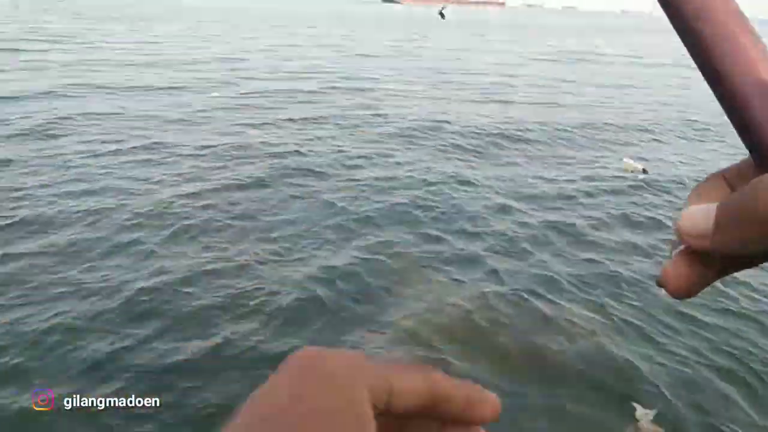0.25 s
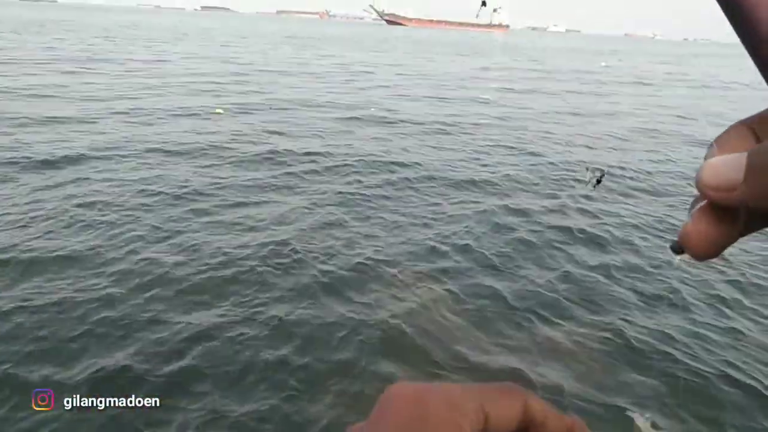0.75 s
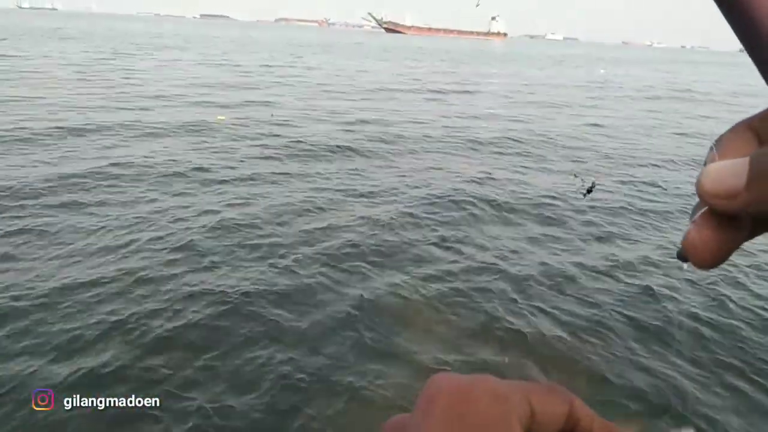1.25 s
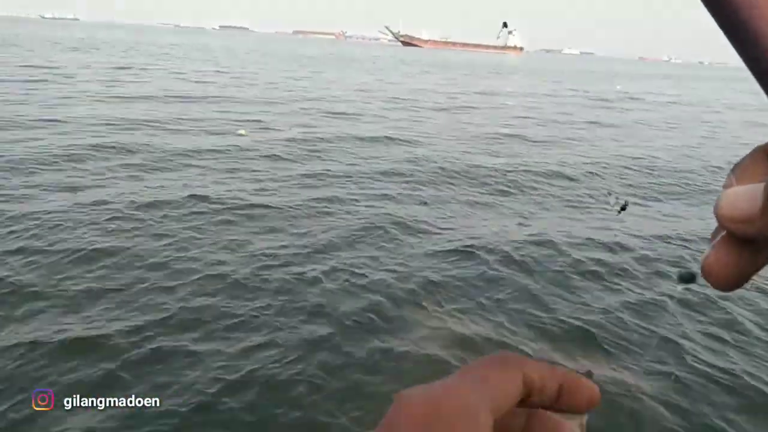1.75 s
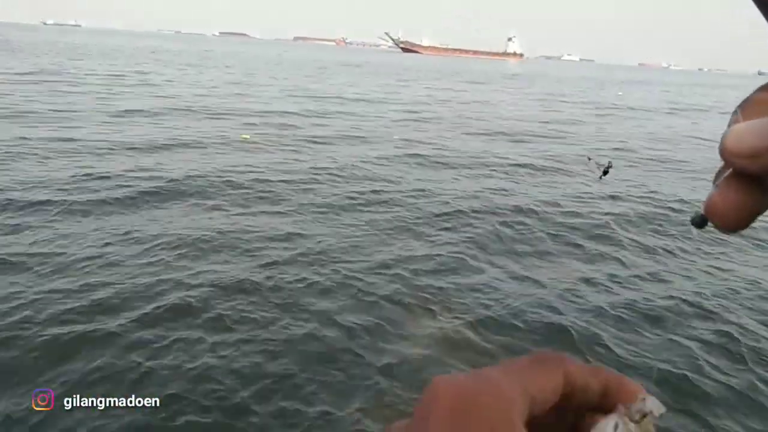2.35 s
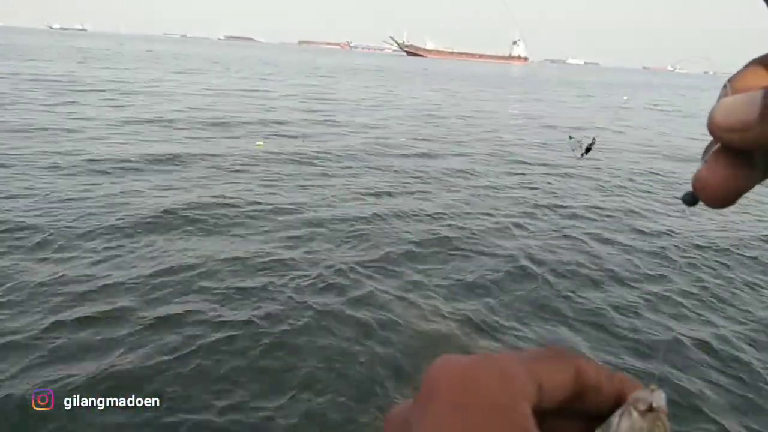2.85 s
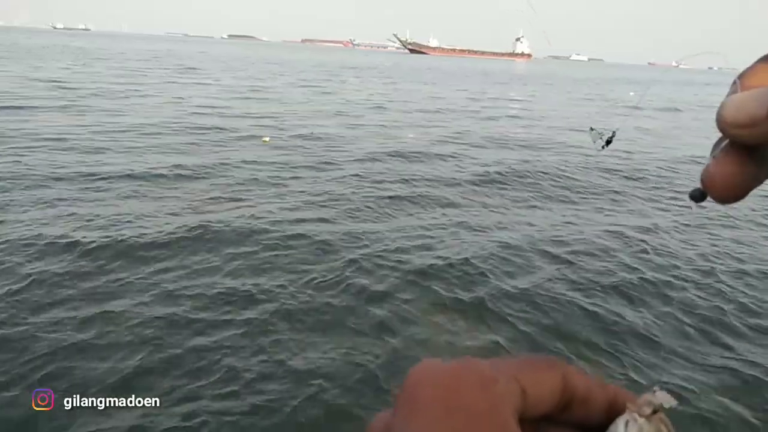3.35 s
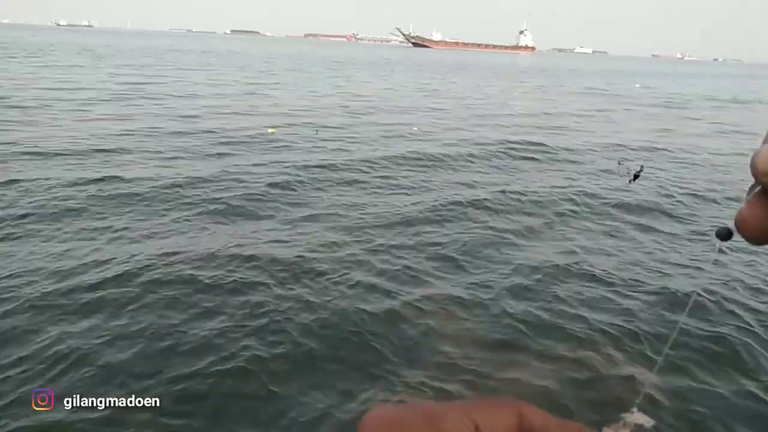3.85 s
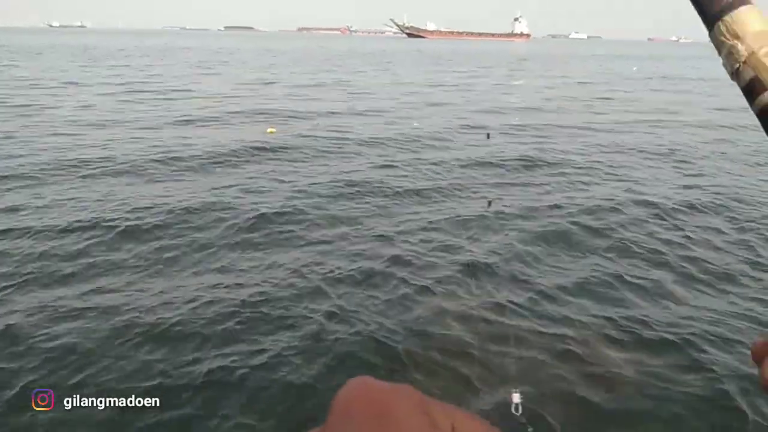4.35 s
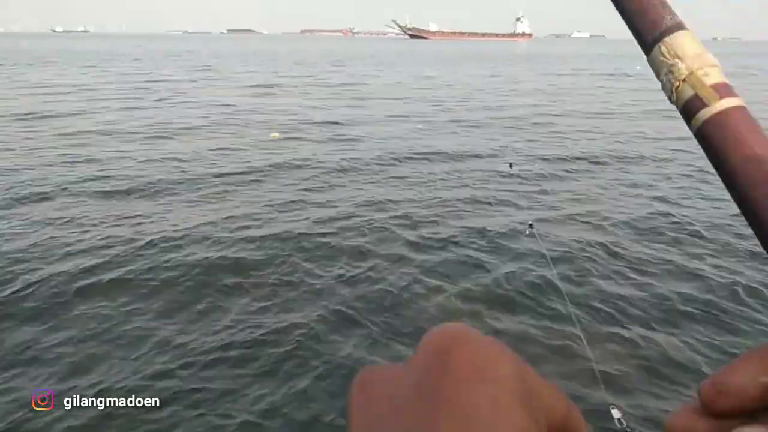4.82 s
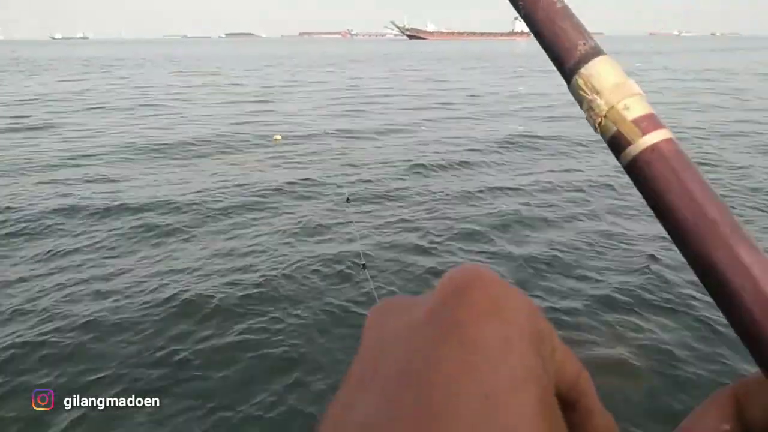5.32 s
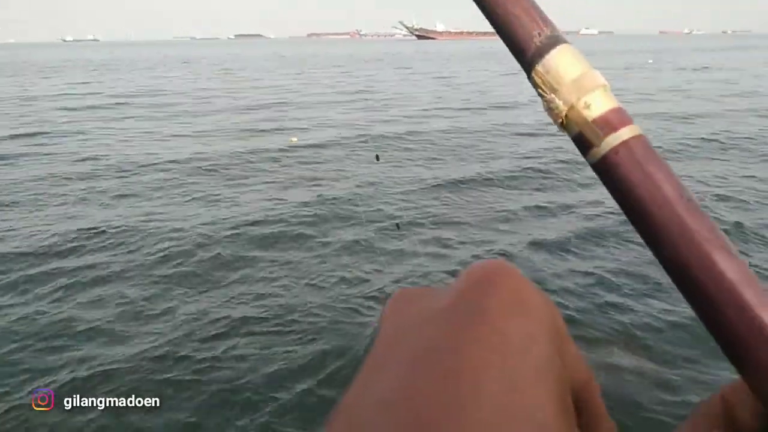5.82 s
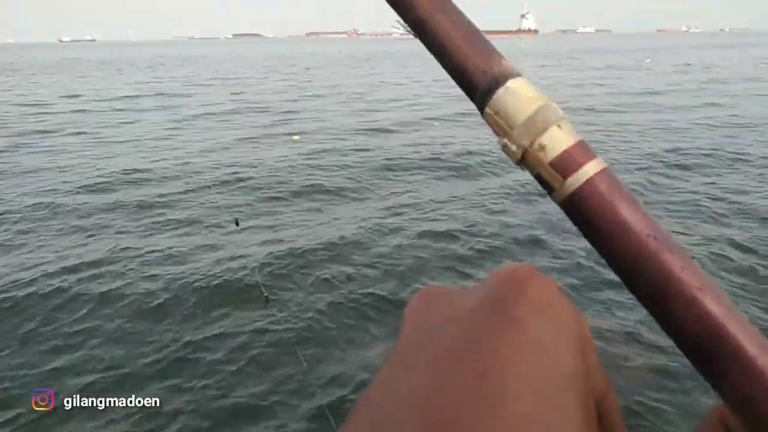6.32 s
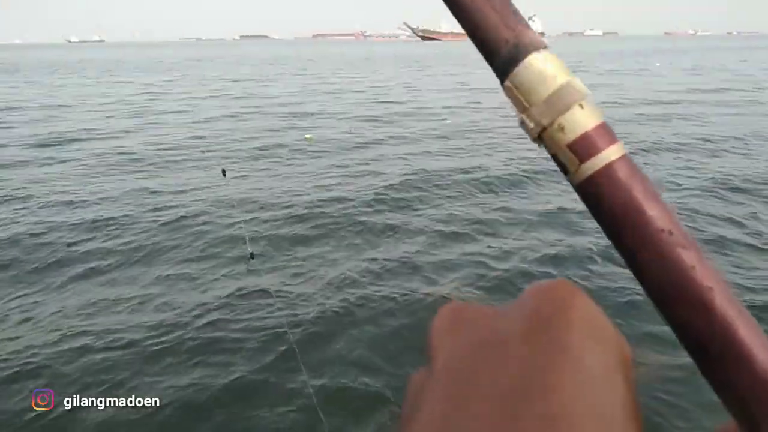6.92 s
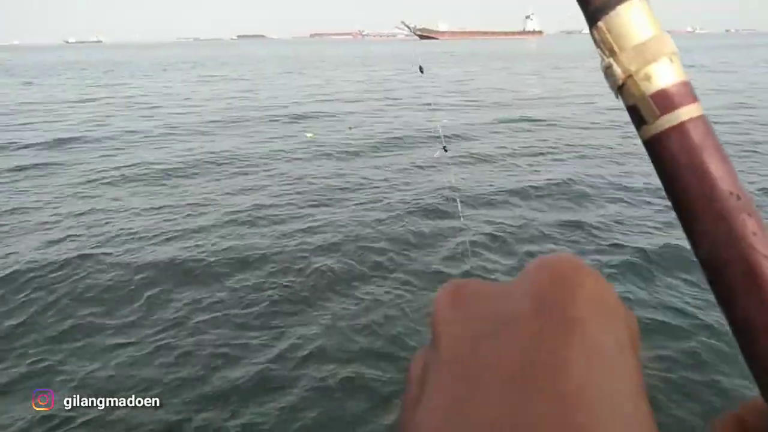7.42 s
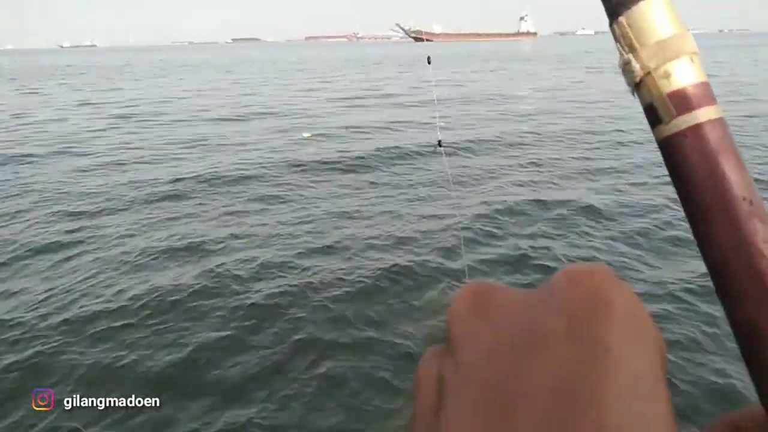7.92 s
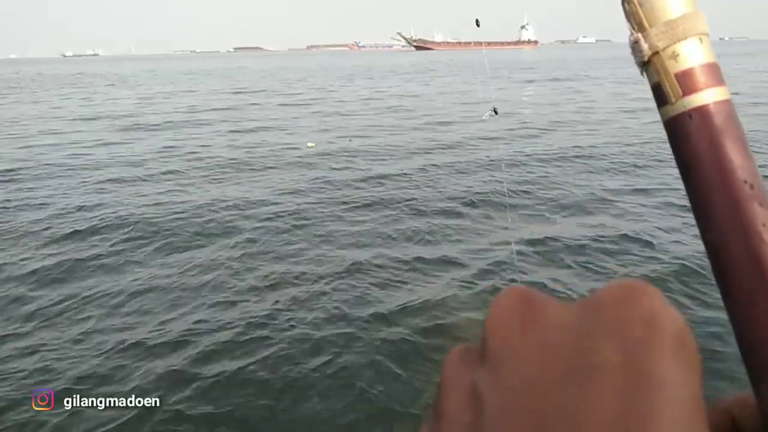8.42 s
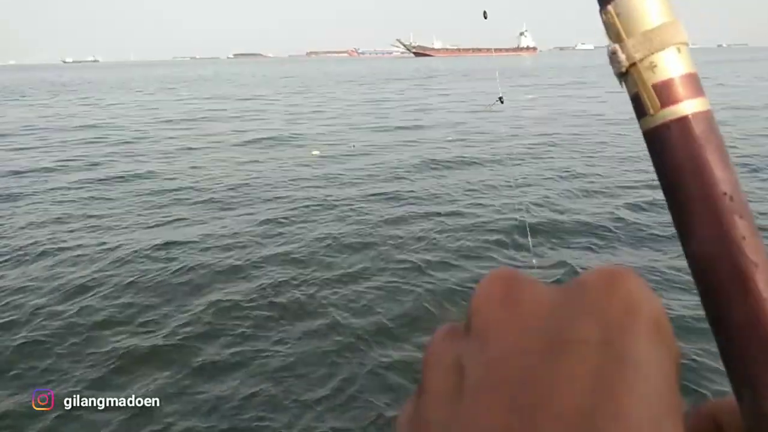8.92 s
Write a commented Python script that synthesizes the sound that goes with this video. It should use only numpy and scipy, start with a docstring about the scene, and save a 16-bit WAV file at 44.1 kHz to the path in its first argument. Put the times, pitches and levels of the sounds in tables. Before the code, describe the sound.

Small waves lap on shore rocks right beside a hand-held microphone, over a very faint distant rumble and open-water hiss. From 0 to 0.9 seconds there is a busy, full wash: ringing bubbles, low gurgles, wet slaps, fizzing spray and bright droplet ticks, with a hollow resonance as water fills a gap. From 1 to 4 seconds it eases into uneven trickles, small splashes and rising plops, with light slaps near 1.5 and 2.4. A sharp slap and splash hits at 4.2, then little laps at 4.7 and 5.1, and near calm until 6. Waves rebuild from 6.3, with the hardest crack at 6.64 and more slaps and gurgles to 7.5. After a brief lull, sloshing returns about 7.9, with a strong dull bump at 8.05 and softer ones near 8.4 to 8.6. Splashing continues to the end at about 9.2.

```python
"""Small harbour waves lap against shore rocks, close to a hand-held microphone, over a far-off rumble.
First a busy wash: waves fold in air as ringing, rising bubbles, slap the stone and throw fine spray,
while water fills a hollow between the rocks. The middle is calmer, with trickles and one sharp slap.
After six seconds the waves grow strong again, the hollow refills, and dull bumps shake the microphone,
mostly around eight seconds. Bubbles are fading tones; water, spray and rumble are also shaped noise."""
import sys
import numpy as np
from scipy import signal
from scipy.fft import rfft, irfft, next_fast_len
from scipy.io import wavfile
from scipy.ndimage import uniform_filter1d, map_coordinates

SR = 44100
rng = np.random.default_rng(int(sys.argv[2]) if len(sys.argv) > 2 else 0)


def pcm_store(signal):
    """Save signal as 16-bit PCM."""
    levels = np.round(np.clip(np.atleast_2d(signal), -1, 1) * 32767)
    wavfile.write(sys.argv[1], SR, levels.astype(np.int16).T)


N = 404397  # length in samples

# tone of the low rumble and shudder: (frequency [Hz], relative level [dB])
LOW_TONE = [(15, -43.5), (25, -5), (59, 12.5), (87, 10.5), (156, 4.5), (263, -5), (317, -22.5),
            (400, -13.5), (520, -39), (880, -120)]
# tone of water cracking on stone: (frequency [Hz], relative level [dB])
CRACK_TONE = [(400, -24.5), (1000, -2), (1500, 2), (2600, 2), (3600, 5.5), (4500, -4.5), (5400, -13),
              (8000, -7.5), (13000, -35.5)]
# tone of fine spray: (frequency [Hz], relative level [dB])
SPRAY_TONE = [(2500, -57), (4500, 3.5), (5600, -6.5), (6600, -2), (7800, 4.5), (9000, 2.5), (10500, -7),
              (12500, -22.5), (15500, -28)]


def amp(db):
    """Turn decibels into gain."""
    return 10 ** (np.asarray(db) / 20)


def unit(x):
    """Scale to an average strength (rms) of 1."""
    return x / np.sqrt(np.mean(x ** 2) + 1e-20)


def along(points, hz):
    """Read a curve of (frequency [Hz], value) points on a logarithmic frequency axis."""
    point_hz, value = np.transpose(points)
    return np.interp(np.log(hz + 1), np.log(point_hz), value)


def filtered(x, response):
    """Multiply the spectrum of x by a function of frequency."""
    m = next_fast_len(N + SR // 2)
    return irfft(rfft(x, m) * response(np.fft.rfftfreq(m, 1 / SR)), m)[:N]


def coloured(x, spectrum):
    """Filter x by (frequency [Hz], gain [dB]) points, with no sound ahead of its cause."""
    m = next_fast_len(N + SR // 2)
    gain = amp(along(spectrum, np.fft.rfftfreq(m, 1 / SR)))
    # folding the cepstrum onto positive times makes the filter minimum-phase
    cepstrum = irfft(np.log(gain), m)
    cepstrum[1:m // 2] *= 2
    cepstrum[m // 2 + 1:] = 0
    return irfft(rfft(x, m) * np.exp(rfft(cepstrum)), m)[:N]


def noise(spectrum):
    """Make coloured noise of rms 1."""
    return unit(coloured(rng.standard_normal(N), spectrum))


def placed(times, waves):
    """Add up rows of waves, each starting at its time [s]."""
    start = np.round(times * SR).astype(int)
    index = start[:, None] + np.arange(waves.shape[1])
    return np.bincount(index.ravel(), waves.ravel(), N)[:N]


def swell(crest, rise, drain):
    """Gain that climbs to 1 at the crest and then drains away, in a straight line in dB."""
    span_db = 20  # level change over one rise or one drain
    t = np.arange(N) / SR - crest
    drop_db = span_db * np.maximum(-t / rise, t / drain)
    return amp(-np.minimum(drop_db, 120))


def swells(rows):
    """Joint gain of (crest [s], rise [s], drain [s], level [dB]) rows; their powers add."""
    power = sum((amp(db) * swell(crest, rise, drain)) ** 2 for crest, rise, drain, db in rows)
    return np.sqrt(power)


def wobble(rate):
    """A smooth random curve through a given number of random points a second."""
    return map_coordinates(rng.standard_normal(1000), [np.arange(N) * rate / SR], mode="mirror")


def rings(hz, life, rise, onset, size, build_s=0):
    """Damped sines that build up, fall 60 dB in `life` cycles and climb by the share `rise` over that life.

    The build-up takes about onset cycles plus build_s seconds; each envelope peaks at 1.
    """
    cycles = hz[:, None] * np.arange(size) / SR
    age = cycles / life[:, None]
    build = 1 - np.exp(-(cycles / (onset + build_s * hz[:, None])) ** 2)
    swing = amp(-60 * age) * build
    swing /= swing.max(1, keepdims=True)
    return swing * np.sin(2 * np.pi * cycles * (1 + rise[:, None] * age / 2))


def swarm(level_db, spectrum, low_hz, high_hz, rate, life, rise, onset, scatter, spread_db, foam_db,
          crowding, size, count=4):
    """Clumps of bubbles over a noisy bed of foam: a trickle makes a few, a surge makes a dense crowd.

    rate is clumps a second, count bubbles a clump, scatter their spread [s], size samples a bubble.
    """
    crowd = amp(crowding * level_db)
    crowd /= np.mean(crowd)
    clumps = int(rate * N / SR)
    # the first draws are shared by a clump, the second belong to each bubble
    jitter, strength, tone = np.repeat(rng.random((clumps, 3)), count, 0).T
    lag, detune, damping, climb, small = rng.random((len(tone), 5)).T
    # clumps fall closer together where the crowd is dense
    turn = (np.repeat(np.arange(clumps), count) + jitter) / clumps
    start = np.minimum(np.searchsorted(np.cumsum(crowd), turn * N), N - 1)
    birth = np.abs(start / SR + scatter * (lag - .5))
    hz = (low_hz + (high_hz - low_hz) * tone) * np.exp(.3 * (detune - .5))
    loudness = amp(-spread_db * strength - 10 * small)
    waves = loudness[:, None] * rings(hz, life * (.5 + damping), rise * climb, onset, size)
    share = amp(level_db[start]) / np.sqrt(crowd[start])  # the bubbles of a crowd share its power
    even = coloured(placed(birth, waves), spectrum)
    driven = coloured(placed(birth, waves * share[:, None]), spectrum)
    return driven / np.std(even) + amp(level_db + foam_db) * noise(spectrum)


def bursts(times, db, t60, spectrum, size):
    """Short coloured noise cracks of about the given peak levels, fading 60 dB in t60 seconds."""
    t = np.arange(size) / SR
    waves = rng.standard_normal((len(times), size)) * amp(-60 * t / t60[:, None])
    plain = np.abs(coloured(placed(times, waves), spectrum))
    peak = np.array([plain[int(s * SR):][:size // 8].max() for s in times])
    return coloured(placed(times, waves * (amp(db) / peak)[:, None]), spectrum)


def harbour():
    """Distant low noise rises and falls under a faint, even hiss of open water."""
    # open water: (frequency [Hz], relative level [dB])
    water_tone = [(100, -3.5), (450, 0.5), (700, -7.5), (1100, -8), (2000, -14), (4000, -22), (6200, -31),
                  (8000, -17), (10000, -34), (15500, -28.5)]
    # distant rumble: (time [s], level [dB])
    rumble_level = [(0, -64), (.5, -66.5), (1.1, -64.5), (3, -63.5), (4.4, -68), (5.4, -67.5), (6.1, -66),
                    (9.17, -63.5)]
    rumble_db = np.interp(np.arange(N) / SR, *np.transpose(rumble_level))
    return amp(rumble_db) * noise(LOW_TONE) + amp(-77.5) * noise(water_tone)


def bumps():
    """Soft, quickly damped low tones on the hand-held microphone, each with a brief low shudder."""
    # dull bumps: (time [s], pitch [Hz], peak level [dB], life [cycles])
    bump_list = [(0.934, 91, -46, 7.3), (6.061, 63.6, -47, 24), (6.692, 89, -42, 10),
                 (7.893, 105.6, -36, 25), (7.917, 96.6, -30, 22), (7.947, 133, -32.5, 11),
                 (8.002, 121, -32, 7.6), (8.054, 126, -19, 3.3), (8.077, 109, -31.5, 6),
                 (8.398, 88, -39, 5.4), (8.446, 101.6, -38, 18), (8.584, 96.6, -39, 23),
                 (8.935, 97.5, -47.5, 7.2)]
    shudder_db, shudder_rise, shudder_fall = -24.5, .03, 0.4  # dB against the bump's peak, s, s
    s, hz, db, life = np.transpose(bump_list)
    shudder = swells([(at, shudder_rise, shudder_fall, peak + shudder_db) for at, peak in zip(s, db)])
    thuds = amp(db)[:, None] * rings(hz, life, np.zeros(len(s)), onset=0.55, size=9000)
    return placed(s, thuds) + shudder * noise(LOW_TONE)


def hollow():
    """Inflowing water stirs the air in a gap between the rocks: noise through two resonances."""
    # water filling the hollow: (crest [s], rise [s], drain [s], level [dB])
    fill = [(0.01, 0.15, 0.24, -44.5), (.46, 0.73, 0.3, -47.5), (7.2, 0.3, 0.35, -49.5),
            (8.27, 0.18, 0.24, -52), (9.1, .05, 0.087, -57)]
    # resonances of the hollow: (frequency [Hz], width [Hz], relative level [dB])
    resonances = [(425.4, 19, 2.5), (471.8, 43, 1.5)]

    def body(f):
        """Sum of resonances, each a band-pass applied twice."""
        return sum(amp(db) * (1j * f * w / (hz * hz - f * f + 1j * f * w)) ** 2
                   for hz, w, db in resonances)

    return swells(fill) * unit(filtered(rng.standard_normal(N), body))


def mist():
    """Sheets of water tear into the finest mist, a crowd of very short, very high pings."""
    # tearing sheets: (crest [s], rise [s], drain [s], level [dB])
    sheets = [(.14, .35, .42, -59.5), (.57, .05, .15, -72), (1.3, .1, .4, -77), (2.55, .4, .25, -75),
              (3.85, .08, 0.087, -83), (4.7, .07, .12, -66), (6.06, .04, .1, -79.5), (7.22, .1, .17, -65),
              (8.12, 0.18, .15, -77.5)]
    # tone of the sizzle: (frequency [Hz], relative level [dB])
    sizzle_tone = [(6000, -29.5), (9500, 1.5), (11500, 2), (13500, -6), (15500, -12)]
    level_db = 20 * np.log10(swells(sheets) + amp(-100))
    return swarm(level_db, sizzle_tone, 11000, 15500, rate=80, life=4, rise=0, onset=.5, scatter=0.0028,
                 spread_db=36, foam_db=-12, crowding=.9, size=130)


def spatter(spray_db):
    """Flung drops land on the stone; they grow faster than the spray."""
    # tone of landing drops: (frequency [Hz], relative level [dB])
    spatter_tone = [(2000, -23.5), (4000, -2), (6000, -1.5), (8200, 2), (10500, -5), (13000, -15.5),
                    (15500, -24)]
    level_db = spray_db - 1 + .4 * (spray_db - spray_db.max())
    return swarm(level_db, spatter_tone, 4000, 12000, rate=140, life=2.5, rise=0, onset=.4, scatter=.002,
                 spread_db=31, foam_db=-15, crowding=.9, size=120)


def crackle(trickle_db):
    """Films of water tear; tearing grows faster than the flow, so surges crackle most."""
    tearing_db = trickle_db - 2.0 + 0.32 * (trickle_db - trickle_db.max())
    return swarm(tearing_db, CRACK_TONE, 1600, 7000, rate=120, life=4.7, rise=0, onset=0.36,
                 scatter=.0015, spread_db=31.5, foam_db=-37, crowding=.9, size=260)


def spray(spray_db):
    """Fine spray fizzes as a crowd of tiny high-pitched bubbles."""
    return swarm(spray_db - 2.0, SPRAY_TONE, 5075, 13960, rate=430, life=39, rise=0, onset=4.9,
                 scatter=0.0033, spread_db=32.0, foam_db=-13.5, crowding=.9, size=420)


def trickle(trickle_db):
    """Trickling water rings as small, steady-pitched bubbles."""
    # tone of the trickle: (frequency [Hz], relative level [dB])
    trickle_tone = [(1400, -35), (2200, -8), (2700, -4.5), (3600, -1), (4600, -1.5), (5400, -7.5),
                    (6500, -9), (9000, -37.5)]
    return swarm(trickle_db - 1.0, trickle_tone, 2400, 5510, rate=250, life=57, rise=0, onset=12,
                 scatter=.006, spread_db=23.5, foam_db=-9.5, crowding=0.94, size=900)


def splash(splash_db):
    """Splashing water rings as middle-sized, steady-pitched bubbles."""
    # tone of the splash: (frequency [Hz], relative level [dB])
    splash_tone = [(600, -31.5), (1000, -0.5), (1250, -1), (2000, 3), (2500, -5.5), (3200, -15.5),
                   (5000, -36)]
    return swarm(splash_db - 0.5, splash_tone, 1100, 2617, rate=150, life=42, rise=0, onset=5.5,
                 scatter=.012, spread_db=18.5, foam_db=-13.0, crowding=1.05, size=1400)


def gurgle(gurgle_db):
    """Pockets of air gurgle as low bubbles that climb slightly in pitch."""
    # tone of the gurgle: (frequency [Hz], relative level [dB])
    gurgle_tone = [(150, -26.5), (300, -29.5), (450, -6.5), (650, 5.5), (1000, 6.5), (1400, -1.5),
                   (2500, -55.5)]
    return swarm(gurgle_db - 2.5, gurgle_tone, 270, 1235, rate=85, life=23, rise=0.07, onset=3.77,
                 scatter=.025, spread_db=13.5, foam_db=-17.5, crowding=.8, size=3600)


def laps():
    """Waves run up the rocks and drain off: each drives gurgle, splash, trickle and spray with one swell."""
    # waves, before each layer's own trim: (crest [s], rise [s], drain [s], splash level [dB],
    # then gurgle, trickle and spray over the splash [dB])
    waves = [(0.042, 0.09, 0.12, -51, 5, -17, -4), (0.145, 0.19, 0.31, -48, -2, 0, 1),
             (0.285, 0.11, 0.53, -51, 4, -4, -6), (0.567, 0.2, 0.3, -52, 4, 1, -3),
             (0.659, 0.06, 0.11, -49, 2, -8, -13), (0.932, 0.07, 0.1, -65, 13, 7, 7),
             (1.253, 0.04, 0.18, -68, -4, 5, 9), (1.356, 0.08, 0.06, -56, -16, -2, 0),
             (1.455, 0.13, 0.17, -59, 1, -3, -8), (1.55, 0.05, 0.19, -56, 3, 0, -10),
             (1.652, 0.08, 0.29, -61, -5, 4, -13), (1.925, 0.07, 0.09, -61, -1, -7, 1),
             (2.049, 0.09, 0.24, -61, -18, 4, -2), (2.147, 0.08, 0.56, -59, -14, 2, 1),
             (2.336, 0.03, 0.21, -60, 9, 7, 2), (2.42, 0.07, 0.26, -57, -1, 3, -2),
             (2.611, 0.29, 0.34, -63, -4, 6, 5), (2.716, 0.02, 0.05, -67, 10, 3, 8),
             (2.865, 0.12, 0.22, -60, -4, -6, -13), (3.021, 0.07, 0.42, -67, -9, 8, 0),
             (3.185, 0.04, 0.14, -60, 10, 1, -11), (3.417, 0.07, 0.09, -56, 4, -10, -19),
             (3.499, 0.06, 0.05, -60, 10, -7, -17), (3.563, 0.07, 0.15, -66, 11, 2, -11),
             (3.683, 0.03, 0.22, -67, -6, 5, -10), (3.855, 0.18, 0.19, -65, -1, 3, -5),
             (4.106, 0.29, 0.08, -75, 12, 2, -11), (4.194, 0.05, 0.07, -46, 2, -5, -11),
             (4.284, 0.04, 0.14, -62, -16, -1, 1), (4.694, 0.1, 0.15, -56, -5, -4, 1),
             (5.011, 0.15, 0.11, -73, 16, 3, -13), (5.081, 0.02, 0.06, -55, 0, -1, -6),
             (5.551, 0.02, 0.15, -81, 0, 8, -1), (5.611, 0.03, 0.2, -72, 7, -16, -12),
             (6.069, 0.05, 0.15, -73, 6, 9, 7), (6.27, 0.14, 0.25, -75, 17, 6, 3),
             (6.344, 0.04, 0.26, -58, -1, 2, -4), (6.436, 0.04, 0.12, -58, 4, 4, -3),
             (6.588, 0.1, 0.11, -56, 4, 4, 2), (6.647, 0.05, 0.11, -47, 2, 2, -3),
             (6.746, 0.03, 0.09, -52, -19, 2, -3), (6.946, 0.07, 0.27, -59, 10, 5, 0),
             (7.098, 0.15, 0.44, -58, 4, -15, -11), (7.222, 0.11, 0.13, -48, -6, -3, -3),
             (7.343, 0.25, 0.09, -57, 4, -11, -17), (7.442, 0.06, 0.18, -54, -1, -16, -22),
             (7.903, 0.17, 0.09, -55, -2, -5, -8), (8.04, 0.07, 0.22, -52, -18, 0, -4),
             (8.109, 0.06, 0.25, -48, -3, -13, -6), (8.379, 0.05, 0.55, -58, -2, -7, -10),
             (8.601, 0.16, 0.19, -52, -2, 0, -5), (8.707, 0.09, 0.16, -51, -9, -3, -11),
             (8.803, 0.02, 0.19, -52, 2, -7, -9), (8.915, 0.29, 0.56, -54, -9, -5, -15),
             (9.125, 0.06, 0.1, -49, 1, -2, -5)]
    # water at rest between waves: gurgle, splash, trickle, spray (level before trim [dB])
    calm_db = [-83, -85, -90, -92]
    churn_db, churn_rate = 2, 22  # uneven bursts: strength in dB, random points a second
    power = np.outer(amp(calm_db) ** 2, np.ones(N))
    for crest, rise, drain, db, gurgle_db, trickle_db, spray_db in waves:
        sizes_db = np.array([gurgle_db, 0, trickle_db, spray_db])
        power += np.outer(amp(db + sizes_db) ** 2, swell(crest, rise, drain) ** 2)
    return [10 * np.log10(p) + churn_db * wobble(churn_rate) for p in power]


def wash():
    """Four sizes of bubble follow the waves, with crackling films, landing drops and mist."""
    gurgle_db, splash_db, trickle_db, spray_db = laps()
    bubbles = gurgle(gurgle_db) + splash(splash_db) + trickle(trickle_db) + spray(spray_db)
    return bubbles + crackle(trickle_db) + spatter(spray_db) + mist()


def droplets():
    """Tiny drops burst close by, each with a bright noise tick and a short ping."""
    # bursting drops, before the trims below: (time [s], level [dB], pitch [Hz])
    drops = [(0.0461, -36, 9040), (0.1007, -33, 9900), (0.1544, -22.5, 8200), (0.248, -32, 7880),
             (0.3359, -30.5, 7160), (0.4773, -32.5, 4130), (0.5533, -35.5, 7610), (1.2193, -44.5, 7050),
             (1.254, -38.5, 9200), (1.3652, -38, 9200), (2.407, -35, 4740), (2.615, -41.5, 4630),
             (4.304, -38, 8100), (4.4674, -35.5, 8050), (4.6547, -37.5, 8200), (4.705, -36.5, 8140),
             (4.8962, -37, 9100), (6.0887, -41, 6830), (6.3368, -41.5, 5200), (6.6837, -34.5, 8850),
             (6.7595, -36.5, 7070), (7.0036, -34, 8900), (7.1602, -35, 8400), (7.865, -40.5, 8900),
             (9.13, -35, 8060)]
    s, db, hz = np.transpose(drops)
    ping = rings(hz, np.full(len(s), 22.), np.zeros(len(s)), onset=3, size=600)
    pings = placed(s + .0004, amp(db + 1.5)[:, None] * ping)
    ticks = bursts(s, db - 6.5, np.full(len(s), .008), SPRAY_TONE, size=800)
    return pings + ticks


def slaps():
    """A crest closes on the stone with a wet crack of noise."""
    # slapping crests: (time [s], level before a 14 dB cut [dB], time to fade 60 dB [s])
    crests = [(0.1024, -18, 0.027), (0.1506, -18, 0.029), (0.4777, -25.5, 0.012), (0.5606, -28, 0.019),
              (0.6744, -31, 0.031), (1.4478, -29, 0.0095), (1.5532, -24, 0.03), (2.4089, -25, 0.014),
              (4.183, -33, 0.025), (4.1954, -18, 0.04), (5.0774, -32.5, 0.045), (6.577, -20, 0.03),
              (6.6433, -8, 0.015), (6.6934, -19, 0.025), (7.0025, -21, 0.025), (7.197, -23, 0.016),
              (7.2566, -25, 0.016), (8.0232, -22, 0.025), (8.59, -19, 0.022), (8.7207, -21, 0.024)]
    s, db, t60 = np.transpose(crests)
    return bursts(s, db - 14.0, t60, CRACK_TONE, size=2400)


def plops():
    """Large bubbles and air pockets ring above the wash; the longer one rings, the further it climbs."""
    # single large bubbles: (time [s], pitch [Hz], level before a 3 dB cut [dB], life [cycles])
    big_bubbles = [(0.032, 1057, -33, 17.6), (0.12, 1110, -34, 13), (0.16, 260.7, -33.5, 30),
                   (0.2, 314, -38.5, 23), (0.305, 1106, -23, 16), (0.393, 713, -41, 17),
                   (0.509, 945, -37, 24), (0.554, 266, -31, 16), (0.608, 484, -35, 11),
                   (0.648, 756, -31, 14), (0.668, 800, -36, 26), (0.705, 944, -34.5, 25),
                   (0.922, 618, -30, 26), (0.943, 730, -35.5, 48), (0.968, 894, -42, 30),
                   (1.254, 4410, -41.5, 21), (1.343, 1376, -42, 60), (1.45, 4370, -35.5, 46),
                   (1.466, 393, -46, 80), (1.562, 1175, -34.5, 32), (1.667, 344, -43.5, 58),
                   (1.893, 1724, -42, 71), (2.127, 1820, -39, 22), (2.153, 1700, -38.5, 35),
                   (2.336, 629, -33, 30), (2.373, 670, -41, 26), (2.465, 622, -39, 23),
                   (2.545, 251.5, -44, 58), (2.594, 234, -45, 29), (2.711, 950, -44, 18),
                   (2.804, 3120, -49, 83), (2.82, 282, -53.5, 12), (2.863, 1685, -42.5, 50),
                   (3.02, 3080, -50.5, 110), (3.088, 3300, -50, 73), (3.184, 823, -46.5, 70),
                   (3.377, 3400, -47, 38), (3.396, 419, -48.5, 57), (3.41, 1030, -36, 29),
                   (3.505, 258.5, -47.5, 18), (3.603, 800, -45.5, 41), (3.631, 418, -50.5, 62),
                   (3.797, 737, -48, 96), (3.855, 1700, -41, 22), (3.987, 820, -43.5, 80),
                   (4.09, 4430, -43.5, 34), (4.181, 1266, -33, 79), (4.198, 2606, -38, 110),
                   (4.202, 1510, -34, 7.3), (4.253, 1110, -40.5, 41), (4.373, 1320, -44, 38),
                   (4.682, 2340, -44.5, 54), (4.704, 1780, -41.5, 17), (4.736, 984, -43.5, 40),
                   (4.866, 863, -47.5, 89), (4.924, 1633, -52.5, 120), (4.967, 746, -38, 71),
                   (5.018, 521, -43.5, 47), (5.066, 634, -44.5, 30), (5.078, 2010, -37.5, 21),
                   (5.286, 3470, -50, 100), (5.549, 3000, -44.5, 38), (5.775, 476, -48, 67),
                   (5.856, 1086, -50, 40), (5.959, 3130, -52.5, 84), (6.056, 2750, -46.5, 29),
                   (6.163, 1115, -49, 87), (6.255, 893, -44, 25), (6.361, 1344, -38, 45),
                   (6.457, 4710, -35.5, 26), (6.542, 720, -40, 57), (6.642, 418, -29, 15),
                   (6.756, 1780, -40, 36), (6.934, 800, -38, 14), (7.002, 830, -43, 18),
                   (7.037, 563, -34, 13), (7.087, 565, -37, 30), (7.104, 1800, -37, 24),
                   (7.165, 500, -39, 22), (7.197, 1500, -31.5, 13), (7.2, 556, -35, 14),
                   (7.258, 1138, -43, 100), (7.259, 1610, -36, 26), (7.313, 510, -40, 18),
                   (7.338, 560, -38.5, 18), (7.432, 1370, -43.5, 86), (7.486, 1150, -40.5, 50),
                   (7.764, 1840, -48, 48), (8.131, 716, -33, 16), (8.286, 1900, -42.5, 44),
                   (8.539, 3760, -38.5, 49), (8.795, 2050, -37, 21), (8.816, 290.5, -39, 43),
                   (8.932, 1482, -39, 29), (9.105, 628.5, -42.5, 100)]
    glide = 3.2  # share of the pitch climbed each second
    glide_below_hz = 750  # higher bubbles climb less
    s, hz, db, life = np.transpose(big_bubbles)
    climb = glide * life / hz * np.minimum(1, glide_below_hz / hz)
    tones = rings(hz, life, climb, onset=0.95, size=9000, build_s=0.0015)
    return placed(s - .001, amp(db - 3.0)[:, None] * tones)


def echo(x):
    """The stones scatter the sound as fading noise tails; the paths change as the water moves along them."""
    # echo among the stones: (frequency [Hz], time to fade 60 dB [s])
    fade = [(200, 0.37), (1000, 0.13), (4000, 0.17), (12000, 0.21)]
    t = np.arange(N) / SR
    out = np.zeros(N)
    step = .4  # s between one set of paths and the next
    for centre in np.arange(0, N / SR + step, step):
        hz, age, z = signal.stft(rng.standard_normal(SR // 4), SR, nperseg=256)
        decay = amp(-60 * age / along(fade, hz)[:, None])
        tail = signal.istft(z * decay, SR, nperseg=256)[1]
        # the first reflection comes 1/300 s late
        delayed = np.pad(tail / np.linalg.norm(tail), (SR // 300, 0))
        near = np.flatnonzero(np.abs(t - centre) < step)
        if len(near):
            part = x[near] * np.cos(np.pi / 2 * (t[near] - centre) / step)  # crossfade between paths
            wet = signal.fftconvolve(part, delayed)[:N - near[0]]
            out[near[0]:near[0] + len(wet)] += wet
    return out


def rippled(x, depth_db, width_hz, hold, evening):
    """Drifting random peaks and dips colour the treble, deepest in quiet passages.

    width_hz and hold [s] space the random grid of peaks and dips.
    """
    hz, t, z = signal.stft(x, SR, nperseg=512, noverlap=384)
    rows, cols = np.meshgrid(hz / width_hz, t / hold, indexing="ij")
    field = map_coordinates(rng.standard_normal((400, 400)), [rows, cols], mode="mirror")
    loudness = uniform_filter1d(np.sqrt(np.mean(np.abs(z) ** 2, axis=0)), 40)
    # the ripple is shallower where the sound is loud
    depth = depth_db * np.clip(hz / 3000, 0, 1)[:, None] / (1 + evening * loudness / loudness.mean())
    gain = amp(depth * np.clip(field, -2, 1.5))
    gain /= np.sqrt(np.mean(gain ** 2, axis=1, keepdims=True))
    return signal.istft(z * gain, SR, nperseg=512, noverlap=384)[1][:N]


def scene():
    """Mix the layers: wash, slaps and all echoes are rippled, the nearest bubbles and drops stay plain."""
    churn, cracks = wash(), slaps()
    beads = plops() + droplets()
    scattered = churn + cracks + echo(amp(-7.5) * (churn + beads + cracks))
    water = beads + rippled(scattered, depth_db=8.5, width_hz=280.7, hold=.15, evening=0.4)
    return (water + hollow() + bumps() + harbour())[None]


def record(dry):
    """Keep only the sound below the upper band limit."""
    top_hz = 15700
    return filtered(dry[0], lambda hz: hz < top_hz)[None]


dry = scene()
out = record(dry)
pcm_store(out)
```